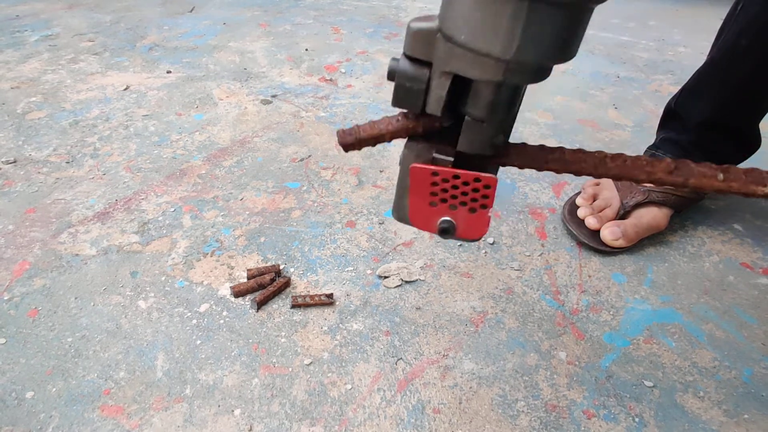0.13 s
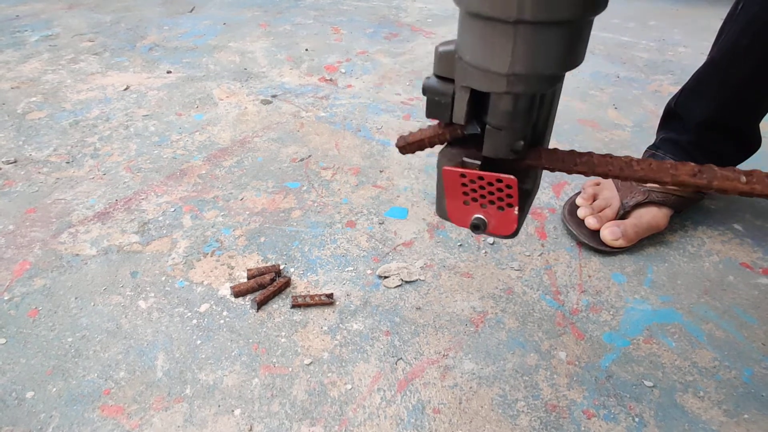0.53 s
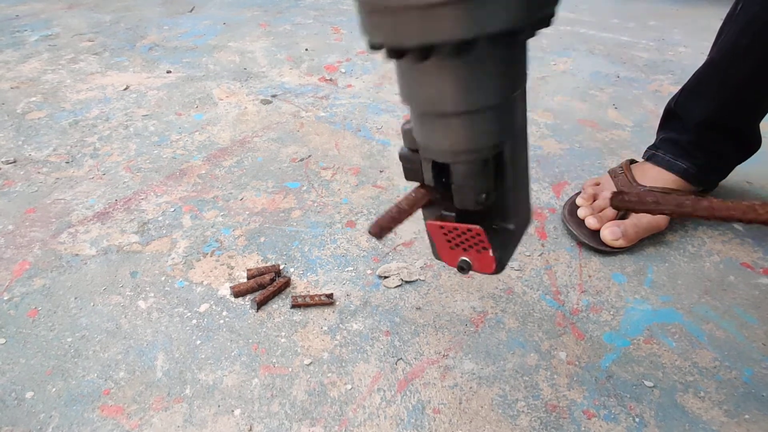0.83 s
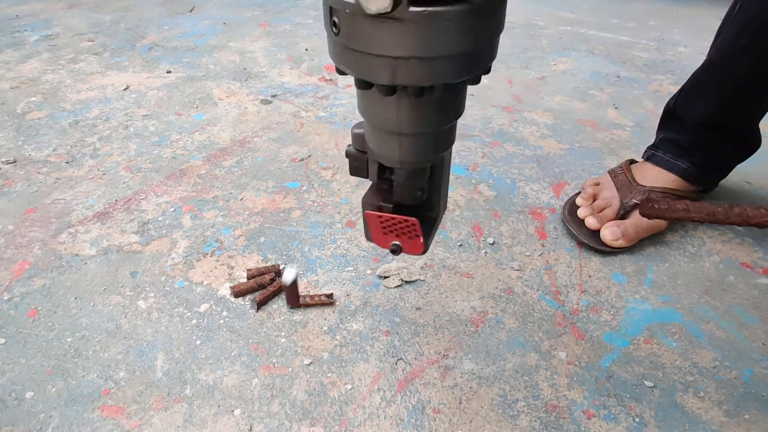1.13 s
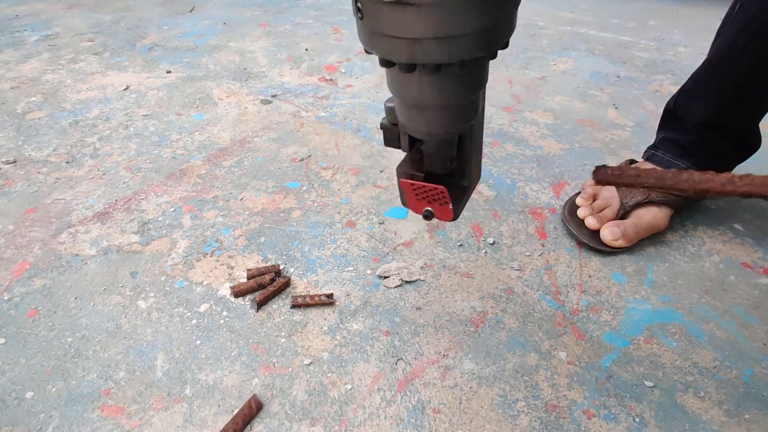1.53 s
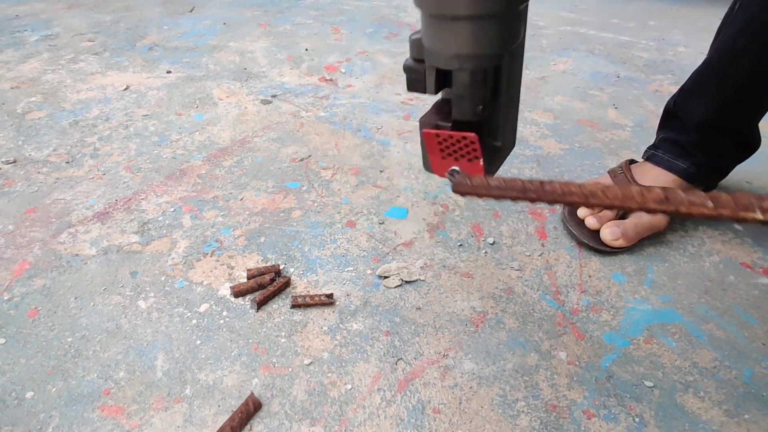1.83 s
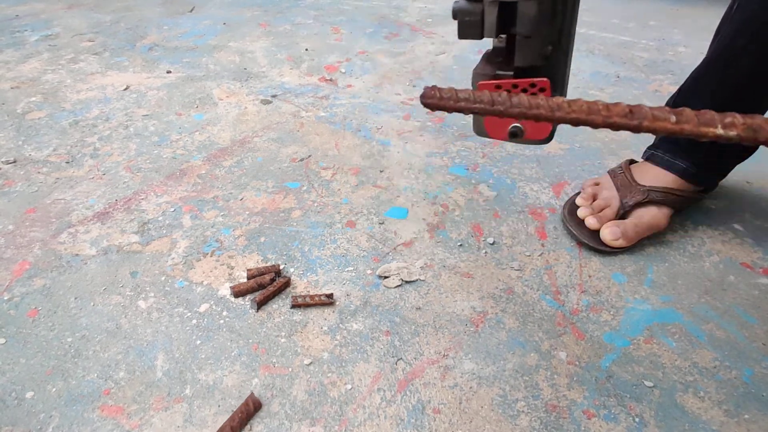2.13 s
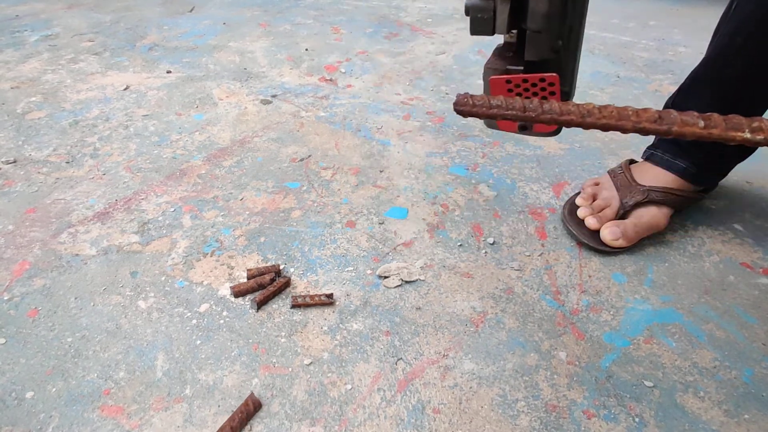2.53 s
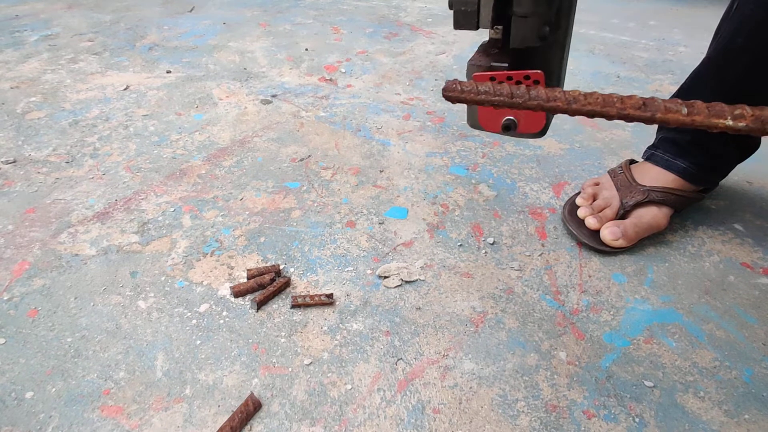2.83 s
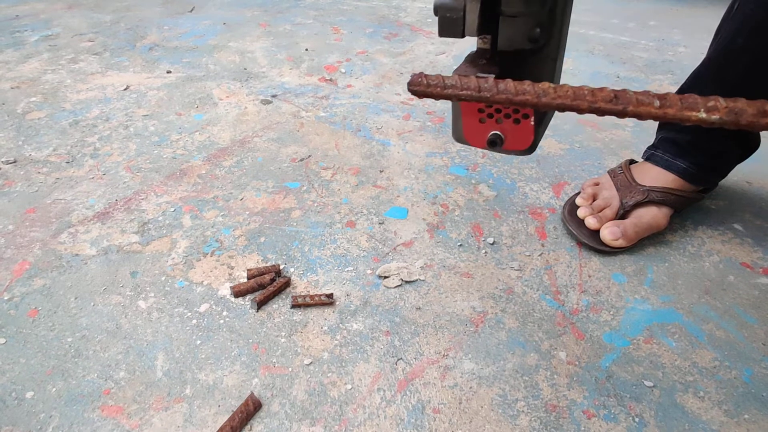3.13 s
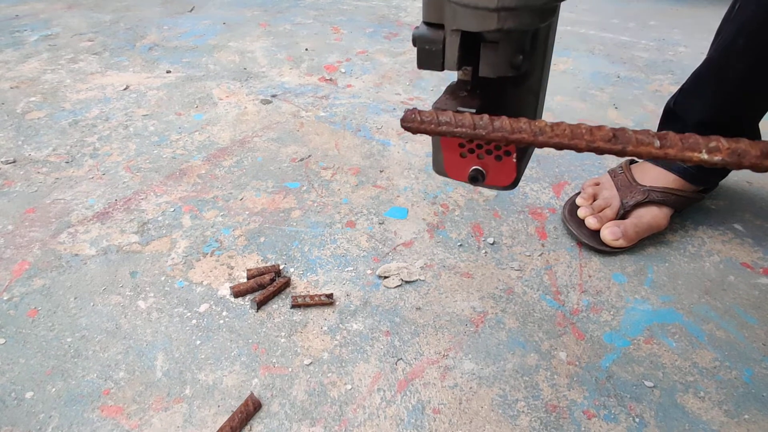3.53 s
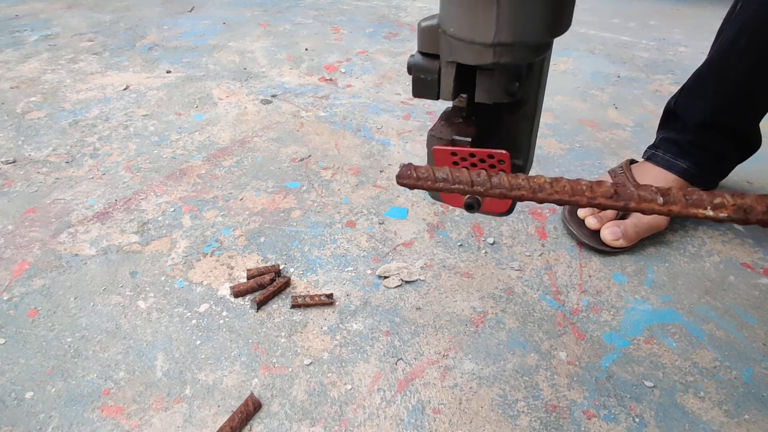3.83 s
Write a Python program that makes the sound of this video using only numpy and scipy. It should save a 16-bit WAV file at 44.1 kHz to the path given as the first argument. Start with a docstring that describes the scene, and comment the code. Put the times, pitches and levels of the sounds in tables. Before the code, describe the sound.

Close electric rebar cutter whines harshly, clicks and groans quickly to a stop; a faint distant clatter, then a steel stub clinks and bounces on concrete, and the cutter restarts in a reverberant workshop, stereo.

```python
"""First heard is the close whine of a hand-held electric rebar cutter, which winds down and later restarts.
Rotor and gear partials follow the shaft speed, with brush and fan noise modulated by the shaft angle.
In the pause the cut steel stub drops and bounces on concrete: noise bursts and a decaying high sine.
A far clatter is a decaying band of noise; shaped noise also gives the workshop hush and low rumble.
Cutter, stub and small clicks are convolved with a decaying noise response for the room."""
import sys
import numpy as np
from scipy import signal
from scipy.fft import rfft, irfft
from scipy.io import wavfile
from scipy.ndimage import uniform_filter1d

SR = 44100
rng = np.random.default_rng(int(sys.argv[2]) if len(sys.argv) > 2 else 0)


def store_pcm(level_fs):
    """Save levels as 16-bit WAV."""
    pcm = np.round(np.clip(level_fs, -1, 1) * 32767).astype(np.int16)
    wavfile.write(sys.argv[1], SR, np.atleast_2d(pcm).T)


N = 176400
T = np.arange(N) / SR  # s
FREQS = np.maximum(np.arange(N // 2 + 1) * SR / N, 1)  # Hz

# Shaft motion: braking onset and duration, restart, time constant of the spin-up
SLOWS_S, STOP_TAKES_S, STARTS_S, SPIN_UP_S = .187, .152, 2.147, .031
SHAFT_HZ, ROTOR_HZ = 97.33, 382.3  # at normal speed
# running speed: time_s, speed_percent of normal
RUNNING_SPEED = [(0, 99.6), (.18, 100.3), (2.42, 100.6), (2.7, 100.1), (3.3, 99.97)]
# loudness of the cutter as it is moved about: time_s, level_db
CUTTER_LEVEL = [(0, 1), (.13, -1), (.18, -3.5), (.29, 0.5), (2.17, 5.5), (2.25, -0.5), (2.42, -2),
                (2.8, -1), (3.3, 0), (3.45, -1.5), (3.7, -.5), (4, -3)]
# rotor and gear partials at normal speed: pitch_hz, level_db before HUM_DB
LOW_PARTIALS = [(290.7, -51), (382.2, -42), (500.6, -51), (1168, -46.5), (1459, -39), (1529, -40),
                (1556, -45.5), (2143, -41.5), (2336, -34.5), (2627, -41.5), (3305, -62), (3408, -58),
                (3601, -33), (3698, -33), (3779, -43)]
# higher partials at normal speed: pitch_hz, level_db before WHINE_DB
HIGH_PARTIALS = [(3989, -40), (4183, -37), (4280, -35), (4377, -38), (4474, -38), (4570, -39), (4770, -40),
                 (4867, -39)]
HUM_DB, WHINE_DB = 0.5, 2
# partial waver (dB rms) and phase wander (rad rms), both less below 2.5 kHz; stereo phase share
WAVER_DB, PHASE_WANDER, LINE_SPREAD = 1.8, .25, .7
# housing resonances that partials sweep through: centre_hz, width_hz, peak_db
SWEPT_RESONANCES = [(3950, 2300, 18.5)]
GEAR_FLARE, GEAR_SPEED_POWER = 0.55, 1.6  # share of the resonances felt; growth with speed
# overtones of the rotor fan: rotor_multiple, level_db, resonance_share
FAN_OVERTONES = [(16, -40, 1), (23, -42, 0)]
FAN_ROUGH, FAN_SPEED_POWER = 0.384, 0.15  # beat depth towards standstill; growth with speed
# main gear mesh, and the resonance it passes just below full speed
MESH_TEETH, MESH_DB, MESH_SPEED_POWER = 40, -23, 4.5
MESH_PEAK_DB, MESH_PEAK_HZ, MESH_WIDTH_HZ = 7.5, 3560, 440
# level of the main mesh tone over time, relative to MESH_DB: time_s, level_db
MESH_LEVEL = [(0, -2), (2.3, -.5), (2.45, -2.5), (2.8, 0), (3.3, 0), (3.45, -3.5)]
# brush and fan noise through the housing: frequency_hz, relative_density_db per Hz
AIR_SPECTRUM = [(100,-25),(250,-59.5),(450,-22.5),(700,-25),(880,-16.5),(1100,-13),(1330,-18.5),(1600,-11.5),(2000,-8.5),(3150,-7.5),(3700,-4.5),(4700,-6),(5500,-11.5),(6900,-15.5),(7900,-10.5),(9000,-19),(10500,-19),(12000,-14.5),(15500,-16)]
AIR_DB, AIR_SPEED_POWER = -17, 1.0
# throb of the air noise: cycles_per_turn, depth
SHAFT_THROB = [(1, 0.097), (2, 0.083), (3, 0.17)]
# rotor multiples that groan through a low gearbox resonance: multiple
GROAN_ORDERS = [4, 5, 7]
GROAN_DB, GROAN_FALL_DB = -26, -3  # first tone at its peak; change for each later tone
GROAN_HZ, GROAN_WIDTH_HZ = 900, 310
# likeness of left and right: frequency_hz, correlation
STEREO_LIKENESS = [(100, 0.95), (500, 0.6), (1200, 0.42), (2500, 0.31), (5000, 0.017), (14000, 0.024)]
# stereo balance of the cutter: frequency_hz, left_minus_right_db
CUTTER_SIDES = [(60, -5), (110, -8), (200, -5.5), (380, -1.5), (700, -2.5), (1290, 1), (2380, -0.5),
                (4400, 1), (8120, -7.5), (15000, -2.5)]
# background hush: frequency_hz, relative_density_db
HUSH_SPECTRUM = [(88, -10), (150, -4.5), (514, -12.5), (836, -18), (1280, -18.5), (1490, -23),
                 (2920, -21.5), (13000, -39)]
HUSH_DB = -48.5
# hush level relative to HUSH_DB: time_s, level_db
HUSH_LEVEL = [(.7, 3), (1.0, 2.5), (1.6, 0.5), (1.8, 5.5), (2.1, 4.5), (2.4, -1)]
# rumble of moving air, before its band limits: frequency_hz, relative_density_db
RUMBLE_SPECTRUM = [(20, 5), (35, 0.5), (65, -7.5), (100, -7), (200, -21), (400, -27.5)]
# rumble level: time_s, level_db
RUMBLE_COURSE = [(.25, -52.5), (.4, -39.5), (1.05, -39.5), (1.1, -35), (1.3, -33.5), (1.5, -37.5),
                 (2.3, -42.5), (3.7, -40)]
# distant clatter: frequency_hz, relative_density_db
FAR_SPECTRUM = [(59, -19), (100, -2.5), (728, -17), (1010, -8.5), (1120, -19.5), (2000, -18), (14000, -35)]
FAR_S, FAR_DB, FAR_T60_S = 1.066, -31.5, 1.17
# small clicks of bar, jaw and trigger: start_s, level_db
CLICKS = [(.127, -14.5), (0.565, -44.5), (.92, -55), (2.1, -48), (2.138, -29)]
CLICK_DECAY_S, CLICK_HZ = 0.009, 5560
# stub meets floor: start_s, crack_db, crack_centre_hz, ring_db, left_minus_right_db
STUB_CONTACTS = [(1.2517, -14.5, 5950, -21, -2), (1.4006, -19, 5030, -41, 1.5),
                 (1.4149, -18.5, 6600, -7.5, -4.5), (1.4235, -40, 5340, -11.5, -26),
                 (1.4885, -32, 6350, -20, -8)]
CRACK_DECAY_S, CRACK_OCTAVES = .0018, 0.32
THUD_DB, THUD_DECAY_S, THUD_HZ = -18.5, 0.0018, 1060  # extra thud of the first contact
KNOCK_RE_CRACK_DB = -11  # stone knock under each bounce
RING_HZ, RING_T60_S = 15690, 0.52
TUMBLE_HZ, TUMBLE_DEPTH = 8.14, 0.63  # two swells per tumble
ROLL_PAN_DB = 12.5  # after the last bounce the stub rolls off to the left
# spectrum of the room tail: frequency_hz, relative_level_db
TAIL_SPECTRUM = [(150, 11), (1000, 0.5), (3800, -2), (4900, 4), (6000, -10.5), (15000, -4.5)]
# reverberation time of the tail: frequency_hz, t60_s
TAIL_T60 = [(200, 0.47), (1500, 1.7), (4000, 1.38), (8000, 2), (15000, 0.25)]
TAIL_DB, EARLY_DB, EARLY_T60_S = -22.5, -13, .1
TOP_HZ = 15740


def undb(db):
    """Amplitude ratio is ten to the power of decibels over twenty."""
    return 10 ** (np.asarray(db) / 20)


def curve(rows):
    """Linear interpolation in time gives a control curve."""
    return np.interp(T, *np.array(rows).T)


def at(rows, hz):
    """Interpolation on a logarithmic frequency axis."""
    f, v = np.array(rows).T
    return np.interp(np.log(hz), np.log(f), v)


def colour(x, gain):
    """Spectral weighting, normalised to an rms of 1."""
    y = irfft(rfft(x) * gain, N)
    return y / np.sqrt(np.mean(y ** 2))


def walk(rate):
    """Low-passed noise is a smooth random fluctuation, here of rms 1."""
    return colour(rng.standard_normal(N), np.exp(-(FREQS / rate) ** 2))


def pair():
    """Mixing mid and side noise sets the interchannel correlation, high in the bass and low in the treble."""
    mid, side = rfft(rng.standard_normal((2, N)))
    c = np.clip(at(STEREO_LIKENESS, FREQS), -.99, .99)
    signs = np.array([[1], [-1]])
    return irfft(mid * np.sqrt(1 + c) + signs * side * np.sqrt(1 - c), N)


def sides(db):
    """A level difference is split equally between left and right gains."""
    return undb(np.array([[1], [-1]]) * db / 2)


def decay(age, t60):
    """Exponential decay falls by 60 dB in the reverberation time."""
    return np.exp(-np.log(1000) * age / t60)


def resonance(hz, centre, width):
    """A bell-shaped resonance halves at half its width from the centre."""
    return .5 ** ((2 * (hz - centre) / width) ** 2)


def burst(start, decay_s, hz, octaves):
    """An impact is modelled as band noise under an exponential decay."""
    size = 4096
    f = np.maximum(np.arange(size // 2 + 1) * SR / size, 1)
    band = 1 + (np.log2(f / hz) / octaves) ** 2
    x = irfft(rfft(rng.standard_normal((2, size))) / band)
    x = x / x.std() * np.exp(-np.arange(size) / SR / decay_s)
    return np.pad(x, ((0, 0), (int(start * SR), N)))[:, :N]


def shaft_speed():
    """Braking takes speed off quadratically; the restart approaches full speed exponentially."""
    slowing = np.clip(1 - (np.maximum(T - SLOWS_S, 0) / STOP_TAKES_S) ** 2, 0, 1)
    starting = 1 - np.exp(-np.maximum(T - STARTS_S, 0) / SPIN_UP_S)
    return (slowing + starting) * curve(RUNNING_SPEED) / 100


def housing_db(hz):
    """Gain in dB of the housing resonances at a given frequency."""
    return sum(db * resonance(hz, f, w) for f, w, db in SWEPT_RESONANCES)


def partial(hz, db, angle, waver, wander, side):
    """A sine locked to rotation; higher ones waver more and generally differ more between channels."""
    apart = side * LINE_SPREAD * np.arccos(np.clip(at(STEREO_LIKENESS, hz), -1, 1))
    phase = hz * angle + rng.uniform(0, 2 * np.pi)

    def shifted(x):
        """A random time shift decorrelates a shared fluctuation."""
        return min(hz / 2500, 1) * np.roll(x, rng.integers(N))

    channels = []
    for ch in range(2):
        gain = undb(db + WAVER_DB * shifted(waver))
        channels.append(gain * np.sin(phase + ch * apart + PHASE_WANDER * shifted(wander)))
    return np.sqrt(2) * np.array(channels)


def gears(speed, angle, waver, wander):
    """Rotor and gear partials scale in pitch with speed and flare within the housing resonances."""
    lines = [(f, d + HUM_DB) for f, d in LOW_PARTIALS]
    lines += [(f, d + WHINE_DB) for f, d in HIGH_PARTIALS]
    out = 0
    for k, (hz, db) in enumerate(lines):
        flare = GEAR_FLARE * (housing_db(hz * speed) - housing_db(hz))
        out = out + partial(hz, db + flare, angle, waver, wander, (-1) ** k)
    return out * speed ** GEAR_SPEED_POWER


def main_mesh(speed, angle, waver, wander):
    """Tooth contact repeats at tooth count times shaft rate, boosted where it crosses a resonance."""
    hz = MESH_TEETH * SHAFT_HZ
    peak = MESH_PEAK_DB * resonance(hz * speed, MESH_PEAK_HZ, MESH_WIDTH_HZ)
    db = MESH_DB + curve(MESH_LEVEL) + peak
    return partial(hz, db, angle, waver, wander / 2, 1) * speed ** MESH_SPEED_POWER


def fan(speed, angle, waver, wander):
    """Fan overtones are rotor multiples, amplitude-modulated three times per shaft turn below full speed."""
    out = 0
    for multiple, db, share in FAN_OVERTONES:
        hz = multiple * ROTOR_HZ
        out = out + partial(hz, db + share * housing_db(hz * speed), angle, waver, wander, 0.68)
    depth = FAN_ROUGH * np.sqrt(np.clip(1 - speed, 0, 1))
    return out * (1 + depth * np.cos(3 * SHAFT_HZ * angle)) * speed ** FAN_SPEED_POWER


def air(speed, angle):
    """Brush and fan turbulence is broadband noise, modulated at harmonics of the shaft rate."""
    throb = 1
    for per_turn, depth in SHAFT_THROB:
        throb = throb + depth * np.cos(per_turn * SHAFT_HZ * angle + rng.uniform(0, 2 * np.pi))
    noise = colour(pair() * throb, undb(at(AIR_SPECTRUM, FREQS)))
    return undb(AIR_DB) * noise * speed ** AIR_SPEED_POWER


def groan(speed, angle):
    """Falling rotor overtones excite one fixed resonance in succession while the motor brakes."""
    out = 0
    for k, multiple in enumerate(GROAN_ORDERS):
        hz = ROTOR_HZ * multiple
        gain = undb(GROAN_DB + k * GROAN_FALL_DB) * resonance(hz * speed, GROAN_HZ, GROAN_WIDTH_HZ)
        out = out + gain * np.sin(hz * angle)
    return out * (T < STARTS_S)


def cutter():
    """All machine sources share one rotation angle, the time integral of speed."""
    speed = shaft_speed()
    angle = 2 * np.pi * np.cumsum(speed * (1 + 0.00048 * walk(14.5))) / SR  # rad per Hz of pitch
    waver, wander = walk(27), walk(20)
    tones = gears(speed, angle, waver, wander) + main_mesh(speed, angle, waver, wander)
    tones = tones + fan(speed, angle, waver, wander) + groan(speed, angle)
    out = (tones + air(speed, angle)) * undb(curve(CUTTER_LEVEL))
    return irfft(rfft(out) * sides(at(CUTTER_SIDES, FREQS)), N)


def hush():
    """Background hush is stationary noise under a slowly varying gain."""
    gain = undb(HUSH_DB + curve(HUSH_LEVEL) + walk(6.9))
    return gain * colour(pair(), undb(at(HUSH_SPECTRUM, FREQS)))


def rumble():
    """Moving air gives low-frequency noise, limited here to about 16-300 Hz."""
    limits = (1 + (FREQS / 300) ** 4) * (1 + (16 / FREQS) ** 4)
    return undb(curve(RUMBLE_COURSE)) * colour(pair(), undb(at(RUMBLE_SPECTRUM, FREQS)) / limits)


def ticks():
    """Light metal contacts are short bursts of broad-band noise."""
    return sum(undb(db) * burst(s, CLICK_DECAY_S, CLICK_HZ, octaves=0.92) for s, db in CLICKS)


def far_clatter():
    """A distant impact is heard as coloured noise with a fast rise and exponential decay."""
    age = np.maximum(T - FAR_S, 0)
    fade = (1 - np.exp(-age / 0.005)) * decay(age, FAR_T60_S)
    return undb(FAR_DB) * fade * colour(pair(), undb(at(FAR_SPECTRUM, FREQS)))


def stub():
    """Each contact cracks, knocks the concrete and restarts a decaying ring that tumbling modulates."""
    first_s, last_s = STUB_CONTACTS[0][0], STUB_CONTACTS[-1][0]
    impacts = undb(THUD_DB) * burst(first_s, THUD_DECAY_S, THUD_HZ, octaves=1.04)
    ring = np.zeros(N)
    for s, db, hz, ring_db, pan_db in STUB_CONTACTS:
        crack = burst(s, CRACK_DECAY_S, hz, CRACK_OCTAVES)
        knock = undb(KNOCK_RE_CRACK_DB) * burst(s, THUD_DECAY_S, hz=2200, octaves=1.4)
        impacts = impacts + undb(db) * sides(pan_db) * (crack + knock)
        # each contact replaces the ring before it
        ring = np.where(T >= s, undb(ring_db) * decay(np.abs(T - s), RING_T60_S), ring)
    facing = 2 * np.pi * TUMBLE_HZ * (T - first_s) + np.array([[.2], [1.0]])  # left, right
    swell = 1 - TUMBLE_DEPTH * np.cos(facing) ** 2
    away = sides(ROLL_PAN_DB * np.clip((T - last_s) / 0.019, 0, 1))
    envelope = np.sqrt(2) * uniform_filter1d(ring, size=400) * swell * away
    return impacts + envelope * np.sin(2 * np.pi * RING_HZ * T)


def room(x):
    """Convolution with decaying noise adds early reflections and a tail with a decay rate for each band."""
    noise = rfft(rng.standard_normal((2, N)))
    tail = 0
    for hz in np.geomspace(125, 16000, 8):
        band = np.maximum(1 - np.abs(np.log2(FREQS / hz)), 0) * undb(at(TAIL_SPECTRUM, FREQS))
        tail = tail + irfft(noise * band, N) * decay(T, at(TAIL_T60, hz))
    early = rng.standard_normal((2, N)) * decay(T, EARLY_T60_S)
    response = 0
    for part, db in ((tail, TAIL_DB), (early, EARLY_DB)):
        response = response + undb(db) * part / np.sqrt(np.sum(part ** 2) / 2)  # set by energy
    return x + signal.fftconvolve(x, response, axes=1)[:, :N]


def scene():
    """Superposition: reverberant cutter, clicks and stub over the workshop background."""
    return room(cutter() + ticks() + stub()) + hush() + rumble() + far_clatter()


def record(dry):
    """A steep elliptic low-pass filter removes the extreme treble."""
    return signal.sosfilt(signal.ellip(10, .2, 80, TOP_HZ, fs=SR, output="sos"), dry)


dry = scene()
out = record(dry)
store_pcm(out)
```